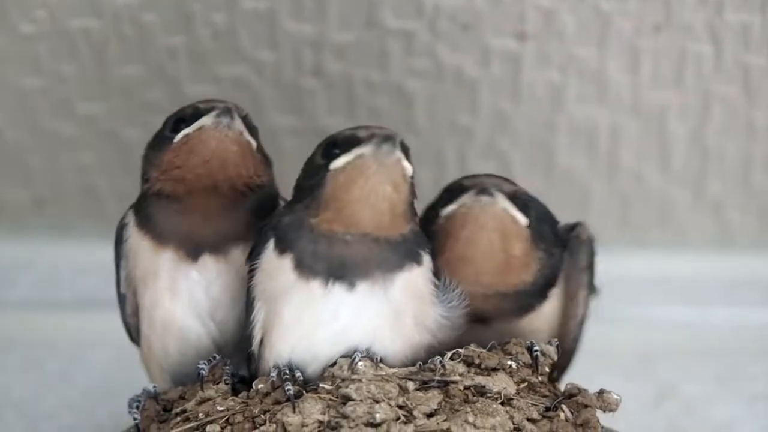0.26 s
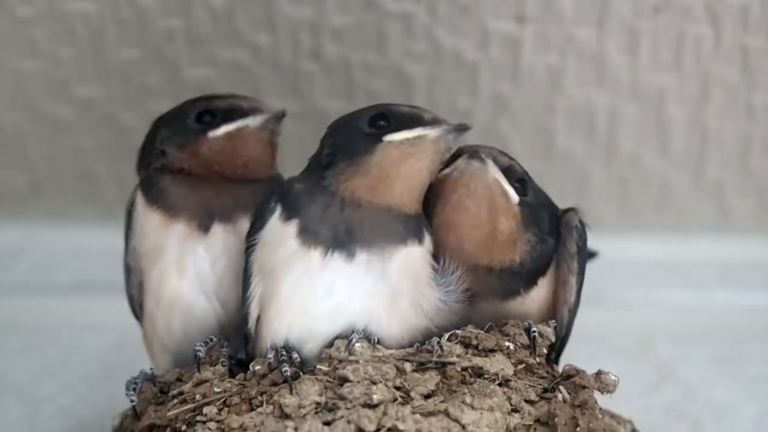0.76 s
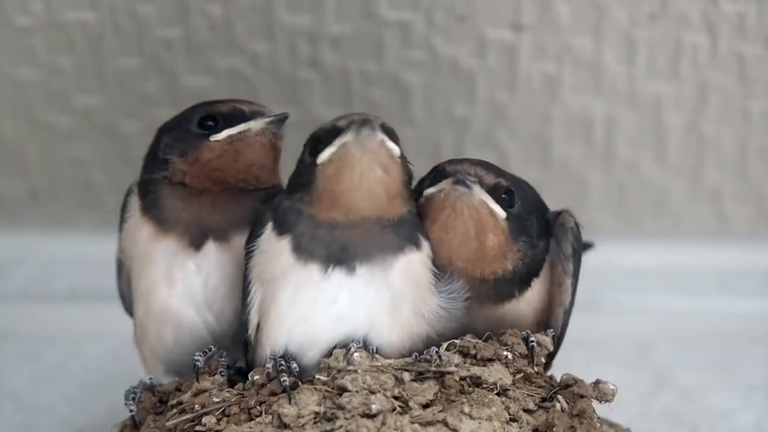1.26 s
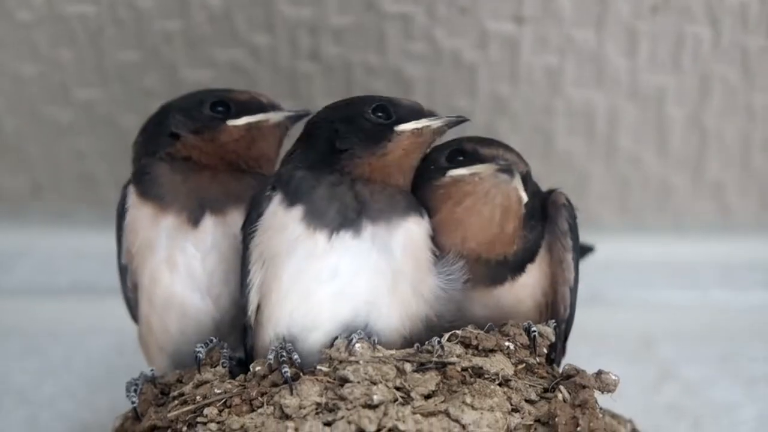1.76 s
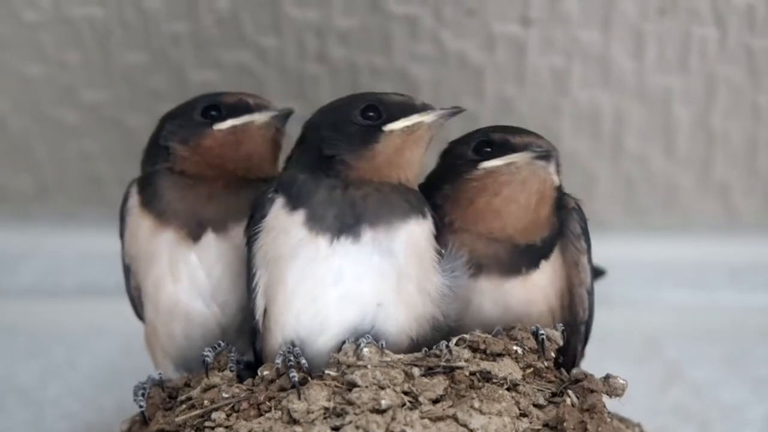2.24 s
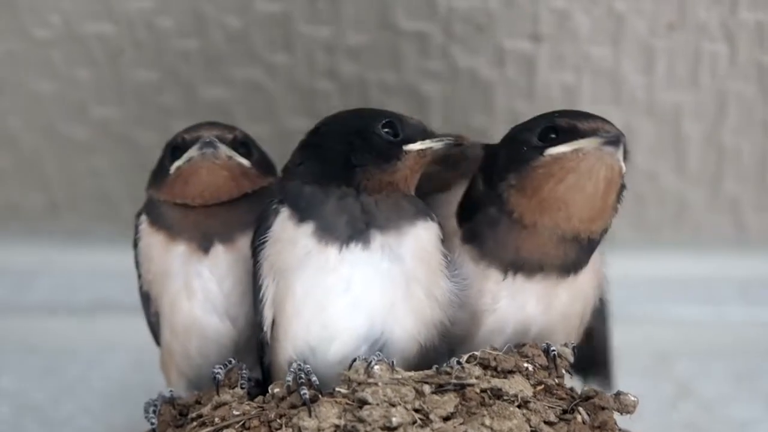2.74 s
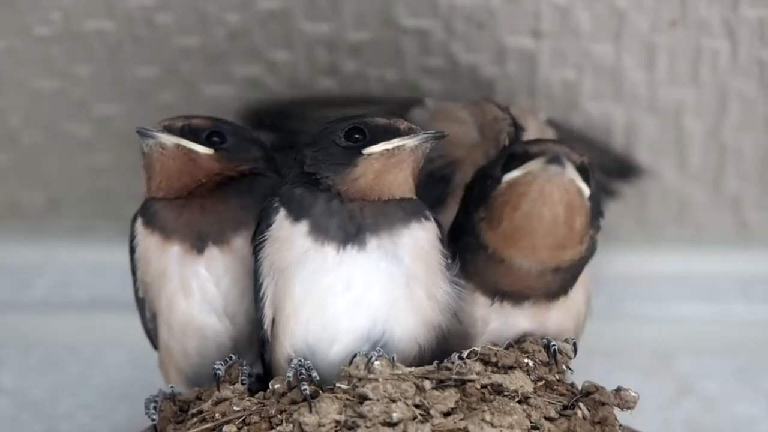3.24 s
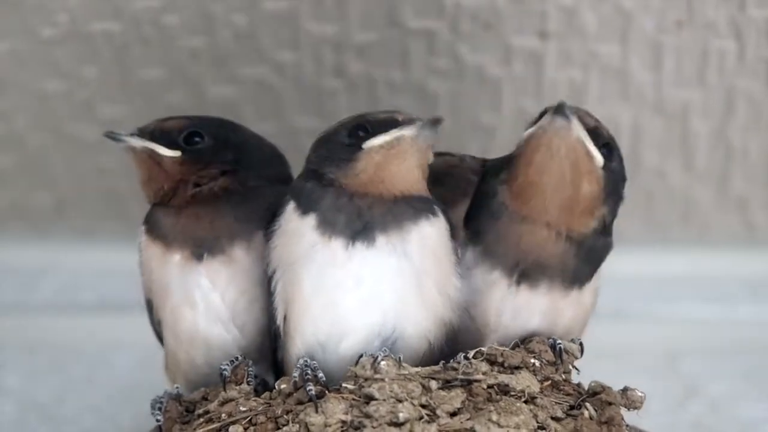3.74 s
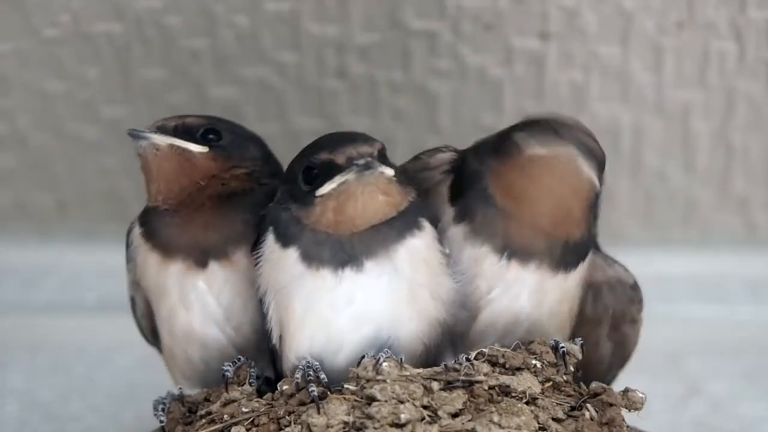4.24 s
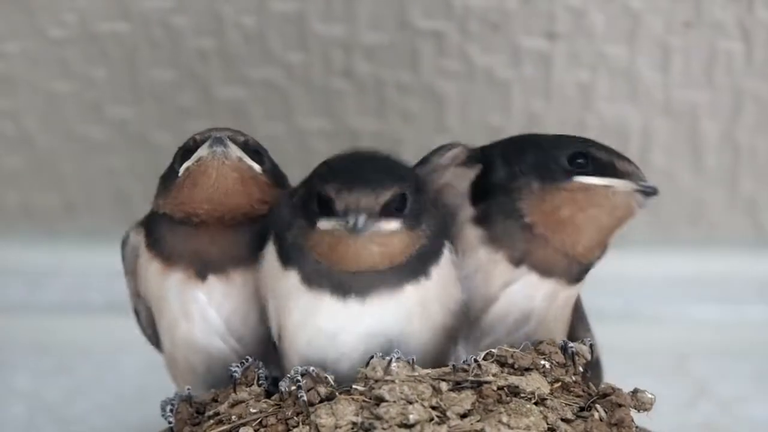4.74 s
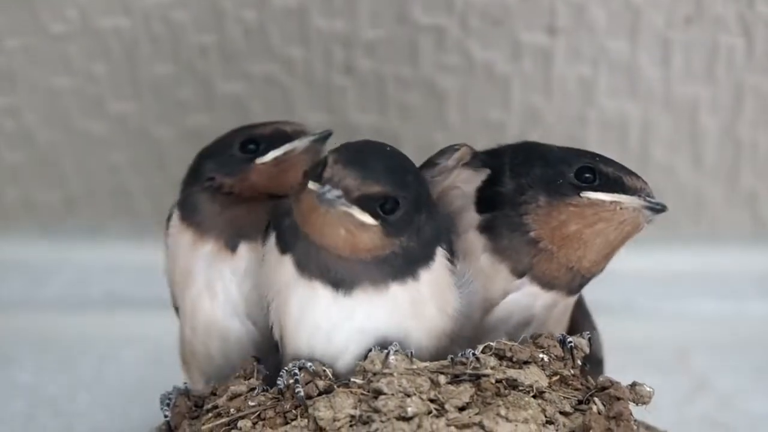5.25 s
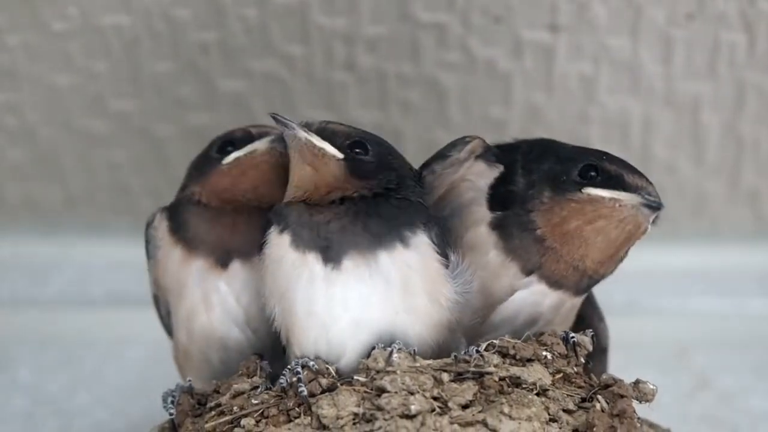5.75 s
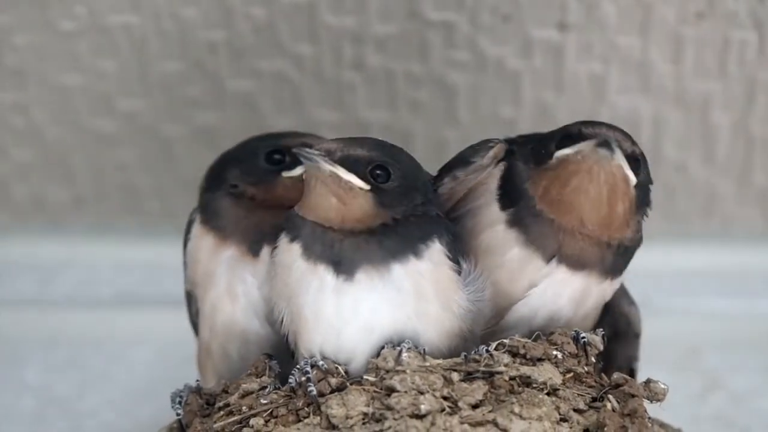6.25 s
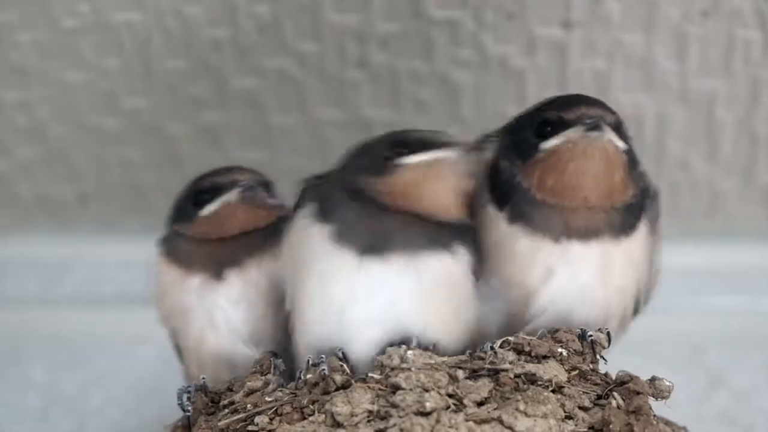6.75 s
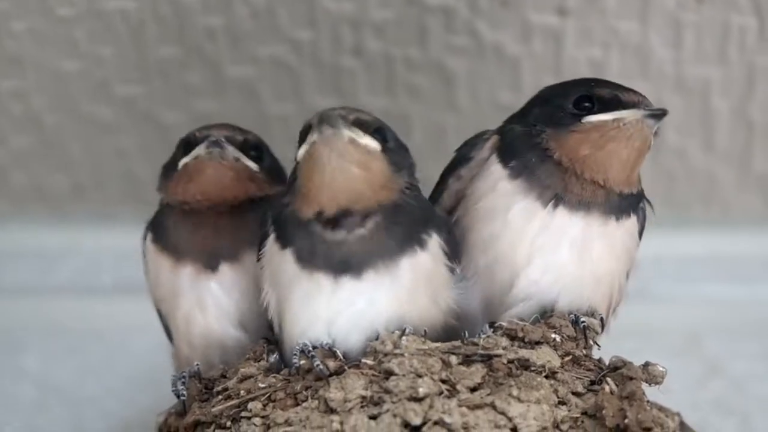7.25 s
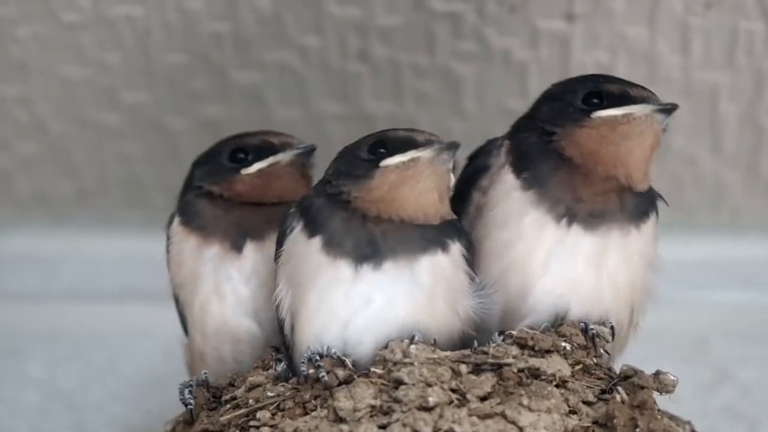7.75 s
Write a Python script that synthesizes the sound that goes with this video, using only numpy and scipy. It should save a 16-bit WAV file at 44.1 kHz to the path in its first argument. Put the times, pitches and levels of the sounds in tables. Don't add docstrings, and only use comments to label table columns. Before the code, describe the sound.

Three swallow chicks in a nest chirp very close by, each call a tenth-second hoarse sagging rasp that swoops up to a clean sharp end. Calls come singly or in loose pairs with gaps of about half a second to a second. Tiny feather rustles fall between them. The porch wall and roof add a short bright ring; faint distant traffic, a low engine drone and slight machine hum continue behind. Close small stereo microphone.

```python
import sys
import numpy as np
from scipy import signal
from scipy.fft import rfft, irfft
from scipy.io import wavfile
from scipy.ndimage import map_coordinates

SR = 44100
rng = np.random.default_rng(int(sys.argv[2]) if len(sys.argv) > 2 else 0)


def amplitude_ratio(level_db):
    exponent = np.asarray(level_db, float) / 20
    return 10 ** exponent


def generate_wav(sig):
    pcm = np.round(np.clip(np.atleast_2d(sig).T, -1, 1) * 32767).astype(np.int16)
    wavfile.write(sys.argv[1], SR, pcm)


N = 352800

# (left minus right [dB], right ear lag [ms], breathy share of the rasp [0-1])
CHICKS = [(-1, 0.024, 0.75), (0, -0.018, 0.57), (-1.2, -0.0042, 0.99)]
HOARSENESS = [.4, .6, .55]
SHEEN = [0.074, .05, 0.5]

# (time before the end [s],
# low voice [Hz], low voice [dB], high voice [Hz], high voice [dB], rasp [dB])
GESTURE_1 = [
    (.113, 2150, -60, 3200, -51, -32),
    (.083, 1860, -51, 2900, -30, -27),
    (.048, 2180, -33.5, 3250, -22.5, -27.5),
    (.034, 2300, -39, 3570, -21.5, -26),
    (.022, 2700, -23.5, 4110, -19, -30.5),
    (.01, 3430, -19.5, 4620, -27, -24.5),
    (0.0022, 3630, -24, 4630, -28, -29.5),
]
GESTURE_2 = [(0.098, 2800, -52, 4600, -35.5, -33), (.071, 2850, -36.5, 4290, -30, -23.5),
             (.048, 2900, -28.5, 4260, -27, -28.5), (.034, 3100, -31, 4400, -28, -21),
             (.022, 3320, -26.5, 4860, -28, -28.5), (.01, 3450, -22.5, 5290, -23, -29.5),
             (0.0031, 3450, -25, 5240, -39, -33)]
GESTURE_3_WIDE = [(.091, 2670, -53, 4520, -34, -32.5), (.072, 2820, -32, 4100, -38, -21.5),
                  (.048, 2610, -28, 3800, -29, -23), (.034, 2320, -32, 4450, -23, -20),
                  (.022, 2900, -19.5, 4900, -23.5, -22.5), (.01, 3690, -18.5, 5200, -23.5, -31),
                  (0.0018, 3810, -18.5, 5600, -44, -37)]
GESTURE_3_CLOSE = [(0.083, 2650, -54, 3900, -57, -37.5), (.071, 2480, -52, 3780, -37, -28.5),
                   (0.0464, 2330, -35.5, 3710, -31, -27), (.034, 2430, -30, 3800, -28, -25.5),
                   (.024, 2800, -22, 4100, -26, -24.5), (.013, 3680, -16.5, 4850, -26.5, -32),
                   (0.005, 3770, -20, 5110, -28.5, -47)]
# (end time [s], length [s], level [dB], lead-in pitch offset [%],
# bill towards the microphone [dB])
CALLS_1 = [
    (0.101, 0.1, -1, 2.5, 6.5),
    (1.657, 0.12, -0.5, 1.5, 3),
    (3.526, .072, -6, 3.5, 2),
    (4.488, 0.11, -2, -1, 5.5),
    (6.076, .107, -0.5, -2, 4.5),
    (7.685, 0.12, 1.5, -1, -6),
]
CALLS_2 = [(.243, 0.082, 1, -0.92, -2.5), (2.995, 0.092, -0.46, 0.34, 3), (4.13, 0.091, -0.58, -0.98, 2),
           (5.617, .093, 0.5, 0.26, -1), (7.233, 0.098, 0.73, 1.6, 0)]
CALLS_3_WIDE = [(1.033, .089, 0.27, -1.03, -1), (2.166, .092, 0.27, 0.97, -2)]
CALLS_3_CLOSE = [
    (3.453, .084, 0.74, 5, 1.5),
    (5.117, 0.093, -1, -4.5, 12.5),
    (7.299, .07, 0.34, .5, 11.5),
]

MIX_TONES = [
    (1, 1),
    (-1, 1),
    (2, 0),
    (0, 2),
    (-1, 2),
    (2, -1),
    (2, 1),
    (1, 2),
]
# (level [dB], ..)
MIX_LEVELS = [(-12, -28, -17, -28, -40, -16, -26, -36), (-21, -14.5, -42, -27, -43, -8.5, -33, -47),
              (-16.5, -19, -25, -41, -44, -16, -45, -47)]
SIDE_TONES = [(.5, .5), (-.5, 1.5), (-1, 2), (-2, 3), (1, 1), (0, 2), (2, 0), (1.5, -.5)]
# (level [dB], ..)
SIDE_LEVELS = [(-16, -9.5, -6, -13, -25, -16, -11, -15.5),
               (-11.5, -7.5, -12.5, -23.5, -27, -33, -15.5, -20.5),
               (-20, -33, -8, -25, -24, -34, -17.5, -12)]
# (frequency [Hz], density [dB per Hz])
THROATS = [
    [(880, -51), (1500, -11), (1890, -19.5), (3000, -6), (4770, -32), (5780, -9), (7570, -23),
     (9820, -24.5), (15000, -66)],
    [(880, -52), (1500, -1), (2340, -11.5), (2830, 1.5), (3310, -7), (4330, -2), (6940, -38),
     (12500, -31.5), (15000, -58)],
    [(880, -47), (1500, -7), (2450, -10.5), (2810, -0.5), (3310, -4), (4090, -1), (7420, -16),
     (11900, -38.5), (15000, -62)],
]
# (frequency [Hz], gain [dB])
MOUTH = [(1000, -20.5), (1900, -4.5), (2500, -0.8), (5000, -3.5), (6000, -8), (7000, -12), (8000, -2),
         (9000, 3), (10500, 3), (12000, 8), (15000, 6)]

# (time [s], length [s], level [dB], centre [Hz])
RUSTLES = [(0.589, 0.034, -38.5, 3660), (0.594, .03, -45.5, 8600), (1.41, 0.073, -54, 10600),
           (1.47, .02, -49.5, 5700), (4.72, 0.03, -52, 5970), (6.919, 0.027, -35.5, 3630),
           (6.916, 0.015, -44, 8640)]

# (time [s], level [dB])
TRAFFIC = [(0.0, 3), (.31, -0.5), (.7, 0), (1.07, -3.5), (1.6, -2.5), (2.34, -4), (3.01, -1), (3.72, -2.5),
           (4.26, 0.5), (5.97, 1.5), (7.06, 5), (8.0, 3)]
TRAFFIC_FOLLOW = [
    0.35,
    0.98,
    0.98,
    0.48,
]
# (frequency [Hz], density [dB per Hz])
STREET = [(25, -17), (60, -6), (130, -9.5), (260, -18.5), (400, -14), (570, -24.5), (680, -13), (1000, -16),
          (1300, -21.5), (2300, -19), (4800, -31.5), (6500, -34.5), (8700, -31), (15500, -55)]
# (frequency [Hz], left-right correlation [-1 to 1])
LIKENESS = [(60, .9998), (130, .995), (290, 0.89), (640, 0.93), (1410, 0.62), (3100, -0.096), (6820, -0.13),
            (15000, -0.2)]
# (time [s], pitch [Hz], level [dB])
LORRY = [(0.0, 43.7, -38.5), (0.3, 41.6, -55), (1.56, 50.95, -53), (2.05, 48.9, -47), (3.88, 51.7, -35),
         (4.63, 51.5, -35.5), (5.86, 48.76, -36), (6.62, 37.2, -41.5), (6.75, 31.5, -46), (8.0, 36, -64)]
# (frequency [Hz], width [Hz], level [dB])
HUM = [(89.6, 8.1, -52.5), (210.6, 3.96, -54), (375, 9.1, -61), (1043, 2.44, -51.5), (1049, 61, -51.5),
       (2097, 7.4, -59.5)]
# (time [s], level [dB])
HUM_SWELL = [(0.0, -51), (2.8, -51.5), (2.95, -46.5), (5.19, -48), (5.81, -43), (6.02, -48.5), (8.0, -49)]

SWOOP_S = .048
BILL, BILL_DIP = (6160, 1060), (4660, 340)
WALL_DB = -6
PORCH_DB, PORCH_T60_S, PORCH_TOP_HZ = -11, 0.19, 11600
YARD_DB, YARD_T60_S, YARD_RING = -18.5, 0.43, (3630, 930)
STREET_DB, HUM_FLICKER_DB = -40, 1.5


def unit(x):
    return x / np.sqrt(np.mean(x ** 2))


def along(table, hz):
    points_hz, values = np.transpose(table)
    return np.interp(np.log(hz + 1), np.log(points_hz + 1), values)


def coloured(size, gain):
    hz = np.arange(size // 2 + 1) * SR / size
    return irfft(rfft(rng.standard_normal(size)) * gain(hz), size)


def bell(hz, centre_hz, width_hz):
    return np.exp(-((hz - centre_hz) / width_hz) ** 2)


def band(size, hz, width_hz):
    return unit(coloured(size, lambda f: bell(f, hz, width_hz)))


def phrase(gesture, end, length, db, offset):
    back, low_hz, low_db, high_hz, high_db, rasp_db = np.transpose(gesture)
    lead = np.clip(back - SWOOP_S, 0, 1)
    stretch = (length - SWOOP_S) / lead[0]
    s = end - np.minimum(back, SWOOP_S) - lead * stretch
    shift = 1 + offset / 100 * np.clip(back / .034 - .3, 0, 1)
    return np.transpose([s, low_hz * shift, low_db + db, high_hz * shift, high_db + db, rasp_db + db])


def membrane(hz, db, shake):
    size = len(hz)
    shaken_hz = hz * (1 + .035 * shake * band(size, 0, 255))
    phase = 2 * np.pi * np.cumsum(shaken_hz) / SR
    flutter = (1 + shake * band(size, 0, 214)) / np.sqrt(1 + shake ** 2)
    waver_db = 1.5 * band(size, 0, 45)
    return phase, np.sqrt(2) * amplitude_ratio(db) * flutter * amplitude_ratio(waver_db)


def mixing_tones(chick, low, low_amp, high, high_amp):
    tones = np.zeros(len(low))
    for (m, n), db in zip(MIX_TONES, MIX_LEVELS[chick]):
        order = abs(m) + abs(n)
        strength = (np.abs(low_amp) ** abs(m) * np.abs(high_amp) ** abs(n)) ** (1 / order)
        strength *= .75 + .65 * band(len(low), 0, 120)
        tones += amplitude_ratio(db) * strength * np.sin(m * low + n * high)
    return tones


def throat_rasp(chick, low, high):
    size, airy = len(low), CHICKS[chick][2]
    rasp = airy * unit(coloured(size, lambda f: amplitude_ratio(along(THROATS[chick], f))))
    for (m, n), db in zip(SIDE_TONES, SIDE_LEVELS[chick]):
        swell = .8 + .6 * band(size, 0, 100)
        rasp += amplitude_ratio(db) * swell * np.sqrt(2) * np.sin(m * low + n * high)
    return rasp


def mouth(x, push_db, sheen_db):
    hz = np.arange(len(x) // 2 + 1) * SR / len(x)
    colour_db = along(MOUTH, hz) + push_db * (bell(hz, *BILL) - bell(hz, *BILL_DIP))
    colour_db += sheen_db * np.clip((hz - 7000) / 3000, 0, 1)
    return irfft(rfft(x) * amplitude_ratio(colour_db), len(x))


def chirp(table, chick, push_db):
    s, *columns = np.transpose(table)
    t = np.arange(s[0] - .005, s[-1] + .004, 1 / SR)
    low_hz, low_db, high_hz, high_db, rasp_db = (np.interp(t, s, c) for c in columns)
    shake = HOARSENESS[chick] * np.clip((s[-1] - t) / .055, .2, 1.2)
    low, low_amp = membrane(low_hz, low_db, shake)
    high, high_amp = membrane(high_hz, high_db, shake)
    voice = low_amp * np.sin(low) + high_amp * np.sin(high)
    rough = mixing_tones(chick, low, low_amp, high, high_amp)
    rough += amplitude_ratio(rasp_db) * throat_rasp(chick, low, high)
    voice += mouth(rough, push_db, SHEEN[chick] * push_db)
    fade_in = np.clip((t - t[0]) / 0.0013, 0, 1)
    fade_out = np.clip((t[-1] - t) / 0.0049, 0, 1)
    return max(int(t[0] * SR), 0), voice * fade_in * fade_out


def begging():
    out = np.zeros((2, N + SR))
    echoes = rng.standard_normal((3, 800)) * np.exp(-np.arange(800) / SR / .004)
    songs = ((0, GESTURE_1, CALLS_1), (1, GESTURE_2, CALLS_2), (2, GESTURE_3_WIDE, CALLS_3_WIDE),
             (2, GESTURE_3_CLOSE, CALLS_3_CLOSE))
    for chick, gesture, calls in songs:
        pan_db, lag_ms = CHICKS[chick][:2]
        echo = amplitude_ratio(WALL_DB) * echoes[chick] / np.linalg.norm(echoes[chick])
        for *call, push_db in calls:
            start, voice = chirp(phrase(gesture, *call), chick, push_db)
            wall = signal.fftconvolve(voice, echo)
            i = np.arange(len(wall))
            voice = np.pad(voice, (0, len(wall) - len(voice)))
            late = map_coordinates(voice, [i - lag_ms * SR / 1000], order=3)
            out[0, start + i] += amplitude_ratio(pan_db / 2) * (voice + wall)
            out[1, start + i] += amplitude_ratio(-pan_db / 2) * (late - wall)
    return out[:, :N]


def rustles():
    out = np.zeros((2, N))
    t = np.arange(N) / SR
    for s, length, db, hz in RUSTLES:
        near = np.abs(t - s) < 3 * length
        puff = amplitude_ratio(db) * np.exp(-((t[near] - s) / length) ** 2)
        for ear in out:
            ear[near] += puff * band(near.sum(), hz, 0.22 * hz)
    return out


def porch(x):
    t = np.arange(SR // 2) / SR
    roof = np.array([band(len(t), 0, PORCH_TOP_HZ) for _ in range(2)]) * amplitude_ratio(-60 * t / PORCH_T60_S)
    yard = np.array([band(len(t), *YARD_RING) for _ in range(2)]) * amplitude_ratio(-60 * t / YARD_T60_S)
    tail = (roof + amplitude_ratio(YARD_DB) * yard) * (1 - np.exp(-t / 0.0015))
    tail /= np.linalg.norm(tail, axis=1, keepdims=True)
    return x + amplitude_ratio(PORCH_DB) * signal.fftconvolve(x, tail, axes=1)[:, :N]


def traffic():
    near_db = np.interp(np.arange(N) / SR, *np.transpose(TRAFFIC))
    layers_hz = [(0, 330), (330, 1150), (1150, 3500), (3500, SR)]
    out = np.zeros((2, N))
    for (lo, hi), follow in zip(layers_hz, TRAFFIC_FOLLOW):
        for sign in (1, -1):
            def gain(f):
                share = np.sqrt(np.clip(1 + sign * along(LIKENESS, f), 0, 2) / 2)
                return amplitude_ratio(along(STREET, f)) * share * (f >= lo) * (f < hi)
            swell_db = follow * near_db + 0.52 * band(N, 0, 14.0)
            out += amplitude_ratio(swell_db) * coloured(N, gain) * np.array([[1], [sign]])
    return amplitude_ratio(STREET_DB) * unit(out)


def lorry():
    t = np.arange(N) / SR
    s, hz, db = np.transpose(LORRY)
    phase = 2 * np.pi * np.cumsum(np.interp(t, s, hz)) / SR
    return np.sqrt(2) * amplitude_ratio(np.interp(t, s, db)) * np.sin(phase)


def machine():
    s, db = np.transpose(HUM_SWELL)
    load_db = np.interp(np.arange(N) / SR, s, db - np.mean(db))
    swell = amplitude_ratio(load_db + HUM_FLICKER_DB * band(N, 0, 3.6))
    return swell * sum(amplitude_ratio(db) * band(N, hz, width) for hz, width, db in HUM)


def scene():
    return porch(begging() + rustles()) + traffic() + lorry() + machine()


def roll_off(x):
    return signal.sosfilt(signal.butter(12, 15710, fs=SR, output="sos"), x)


def record(dry):
    mix = dry - .0023
    return roll_off(mix)


dry = scene()
out = record(dry)
generate_wav(out)
```